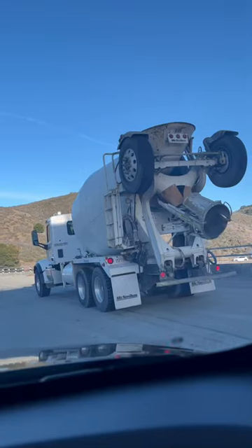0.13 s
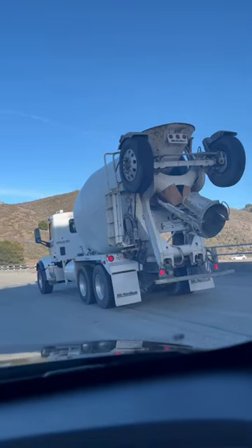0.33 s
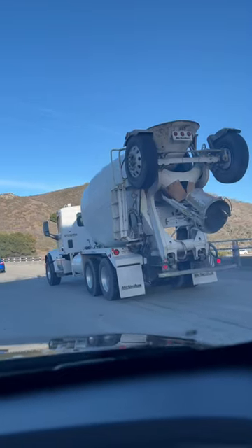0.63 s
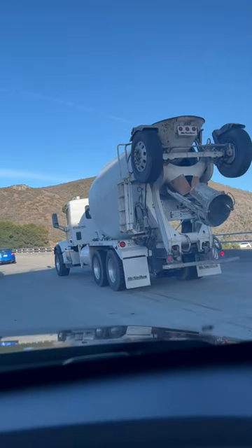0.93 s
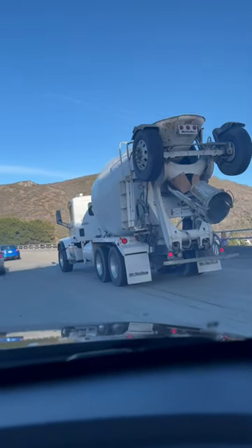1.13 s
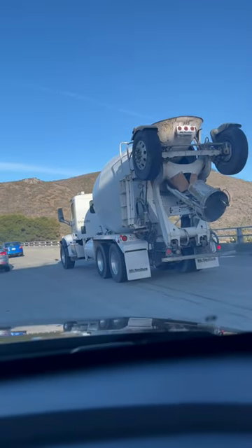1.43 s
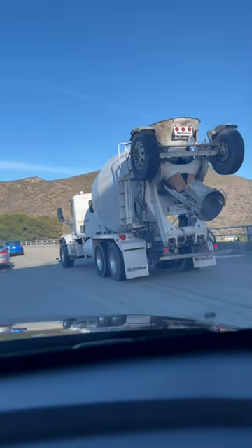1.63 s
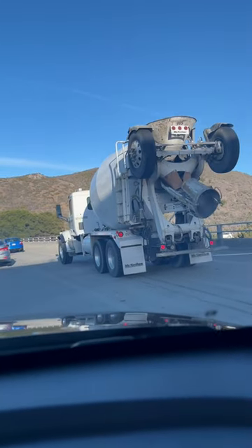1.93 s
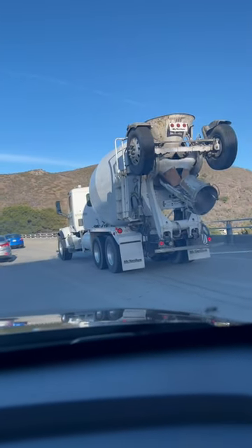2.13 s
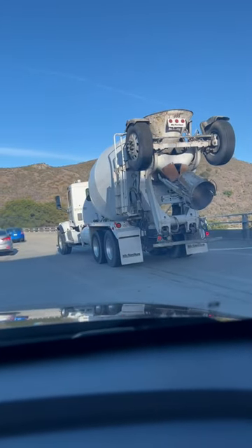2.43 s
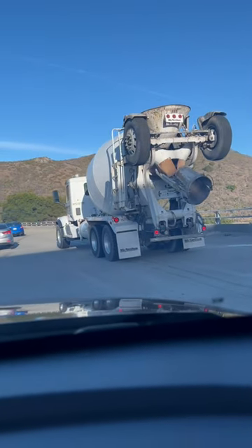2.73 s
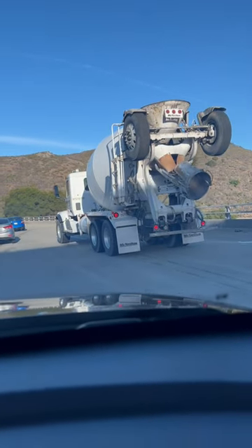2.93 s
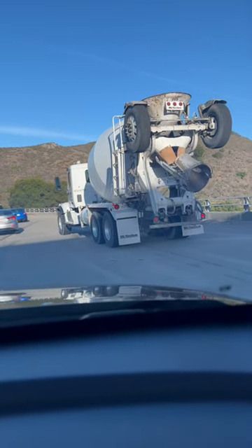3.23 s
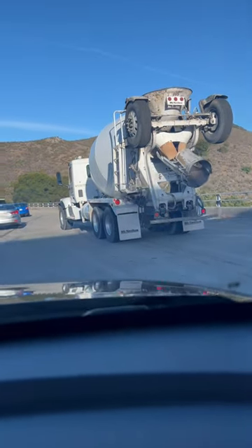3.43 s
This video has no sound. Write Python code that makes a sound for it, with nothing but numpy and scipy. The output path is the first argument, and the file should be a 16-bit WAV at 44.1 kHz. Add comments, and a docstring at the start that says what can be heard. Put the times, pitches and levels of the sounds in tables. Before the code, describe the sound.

Deep car-cabin rumble with diesel drone, a few finger taps, trim ticks and faint fabric rustles

```python
"""Inside a slowly moving car, as heard at a hand-held phone near the windscreen.
After a short silence a steady bed sets in: band-shaped noise for road rumble, boom, drone, tyre roar and
air hiss; sine lines on multiples of a diesel's cycle; a faint whine. Chirped finger taps begin at 0.35 s and
decaying noise ticks of trim at 0.56 s. A soft thump falls at 0.74 s and gliding squeaks come near 1 s;
from 1.4 s fabric rustles in swells of noise grains, and ticks are most frequent from 2.4 s on."""
import sys
import numpy as np
from scipy import signal
from scipy.fft import rfft, irfft
from scipy.io import wavfile
from scipy.ndimage import uniform_filter1d

SR = 44100
rng = np.random.default_rng(int(sys.argv[2]) if len(sys.argv) > 2 else 0)


def inscribe(sig):
    """Save sig as 16-bit PCM at rate SR to the path in sys.argv[1].

    A 1-D sig is mono; a 2-D sig holds one channel per row.
    Samples are clipped to [-1, 1] before scaling.
    """
    pcm = np.round(np.clip(np.atleast_2d(sig).T, -1, 1) * 32767)
    wavfile.write(sys.argv[1], SR, pcm.astype(np.int16))


N = 158319
TIME_S = np.arange(N) / SR
TOP_HZ = 15800  # upper band limit


def undb(db):
    """Level law: amplitude gain is 10 to the power dB / 20."""
    return 10 ** (np.asarray(db) / 20)


def col(table, k):
    """Linear interpolation: column k of a time table, at every sample."""
    points = np.array(table, float)
    return np.interp(TIME_S, points[:, 0], points[:, k])


def noise():
    """White noise: independent Gaussian samples."""
    return rng.standard_normal(N)


def colour(x, shape, lo_hz=0, hi_hz=1e9):
    """Spectral shaping by (f/Hz, level/dB) points, scaled to rms 1 within lo-hi by Parseval's theorem."""
    points = np.array(shape, float)
    f = np.arange(N // 2 + 1) * SR / N + 1e-3  # the offset keeps the logarithm finite
    gain_db = np.interp(np.log(f), np.log(points[:, 0]), points[:, 1], left=-200, right=-200)
    spectrum = rfft(x) * undb(gain_db)
    in_band = spectrum[(f > lo_hz) & (f < hi_hz)]
    return irfft(spectrum, N) * N / np.sqrt(2 * np.sum(np.abs(in_band) ** 2))


def walk(rate):
    """Low-pass random fluctuation: values drawn at the rate (Hz), smoothed twice; spread near 1."""
    k = int(SR / rate)
    held = np.repeat(rng.standard_normal(N // k + 1), k)[:N]
    return 1.3 * uniform_filter1d(uniform_filter1d(held, k), k)


def fade(t, t60):
    """Exponential decay from t = 0, falling 60 dB in t60 seconds."""
    return (t >= 0) * np.exp(-np.log(1000) * np.abs(t) / t60)


# Air hiss spectra, common and left-right difference: f/Hz, level/dB per Hz
HISS_SPECTRUM = [(3000, -11.5), (4000, 1.5), (4700, 3.5), (6000, 1), (8000, -2), (9600, -4), (11300, -5),
                 (12300, -26.5)]
HISS_SIDE_SPECTRUM = [(3000, -9.5), (4000, 1), (5300, -0.5), (6500, -11.5), (8500, -10.5), (10500, -7.5),
                      (14500, -0.5), (16000, -6.5)]
# Air hiss course: t/s, common level/dB, difference level/dB
HISS_LEVELS = [(0.05, -83.5, -87), (2.36, -88, -87.5), (2.63, -84, -84), (2.98, -86.5, -85),
               (3.3, -83, -82), (3.4, -77, -81.5), (3.56, -81, -78)]


def air():
    """Broadband flow noise, slightly uneven; returns mid and side."""
    lump = undb(1.0 * walk(13))
    mid = lump * undb(col(HISS_LEVELS, 1)) * colour(noise(), HISS_SPECTRUM)
    side = lump * undb(col(HISS_LEVELS, 2)) * colour(noise(), HISS_SIDE_SPECTRUM)
    return np.array([mid, side])


# Faint high whine: f/Hz, level/dB (peak amplitude, before fluctuation)
WHINE_LINES = [(9390, -104), (9508, -96), (9691, -99)]
# Squeaks: start t/s, length t/s, from f/Hz, to f/Hz, level/dB (peak amplitude, before roughness)
SQUEAK_GLIDES = [(0.964, 0.05, 2520, 2570, -65), (1.017, 0.028, 2400, 2530, -62),
                 (1.042, .026, 2450, 2200, -68), (1.068, .024, 2150, 2250, -74)]


def thin_tones():
    """Amplitude modulation: gliding squeaks made rough at a fast rate, over wavering whine lines."""
    squeaks = 0
    for start, length, from_hz, to_hz, db in SQUEAK_GLIDES:
        u = np.clip((TIME_S - start) / length, 0, 1)
        cycles = length * (from_hz * u + (to_hz - from_hz) * u ** 2 / 2)
        squeaks = squeaks + undb(db) * np.sin(np.pi * u) * np.sin(2 * np.pi * cycles)
    rough = undb(2.0 * walk(300))
    whine = sum(undb(db + 3.6 * walk(46)) * np.sin(2 * np.pi * hz * TIME_S) for hz, db in WHINE_LINES)
    return squeaks * rough + whine


# Fabric spectrum: f/Hz, level/dB per Hz
FABRIC_SPECTRUM = [(2500, -12), (4000, 8.5), (6500, 9), (9000, 5.5), (11500, 0.5), (13000, -38.5)]
# Rustle swells: start t/s, length t/s, level/dB at the crest
RUSTLE_SWELLS = [(1.4, 0.23, -80.5), (2.36, 0.14, -82.5), (2.769, 0.064, -71.5), (2.82, 0.057, -75.5),
                 (2.866, 0.054, -77.5), (3.03, 0.13, -89), (3.193, .04, -76), (3.321, .06, -81.5),
                 (3.383, 0.067, -73.5), (3.435, 0.15, -83)]
RUSTLE_PER_S, RUSTLE_SCATTER_DB, RUSTLE_SIDE_DB = 2500, 2, -4


def rustle():
    """Shot noise: dense random grains of fabric, heard in short swells; mid and side."""
    swell = 0
    for start, length, db in RUSTLE_SWELLS:
        u = np.clip((TIME_S - start) / length, 0, 1)
        swell = swell + undb(db) * np.sqrt(np.clip(np.sin(np.pi * u), 0, 1))
    struck = rng.random(N) < RUSTLE_PER_S / SR
    grains = struck * undb(RUSTLE_SCATTER_DB * rng.exponential(size=N))
    smear = signal.lfilter([1], [1, -.985], grains)  # each grain decays with a 1.5 ms time constant
    return swell * np.array([undb(db) * colour(smear * noise(), FABRIC_SPECTRUM)
                             for db in (0, RUSTLE_SIDE_DB)])


# Low modes of the trim, before scatter: f/Hz, level/dB, decay time t60/s
TRIM_MODES = [(1490, -6, .012), (2060, 0, .026), (2600, -10, .01), (3110, -4, 0.016), (3900, -9.5, .01),
              (4700, -9, .01)]
# Trim ticks: t/s, crack level/dB, crack centre f/Hz, low-mode level/dB
TRIM_TICKS = [(0.5627, -76, 6700, -62), (.579, -81, 7000, -79), (.9, -68, 10000, -71),
              (1.437, -81, 4000, -65), (1.484, -62.5, 8200, -45.5), (1.527, -78, 8000, -60.5),
              (1.955, -79.5, 9400, -75), (2.4315, -69.5, 6450, -73.5), (2.434, -73.5, 6480, -80),
              (2.501, -77, 8470, -81), (2.7314, -73, 4500, -65.5), (2.7845, -64, 6000, -59),
              (2.7975, -65, 6500, -66), (2.8285, -59.5, 7000, -60), (2.834, -64, 5000, -67),
              (2.843, -70, 5000, -63), (3.2027, -68.5, 5960, -57.5), (3.208, -72, 4500, -64),
              (3.378, -80, 3000, -60), (3.4345, -72, 3500, -53), (3.44, -68, 4800, -53),
              (3.458, -73, 7200, -78), (3.484, -70, 7900, -74)]
CLICK_T60_S, TAIL_T60_S, TAIL_DB = .025, 0.1, -11.5  # crack, then its cabin tail
CLICK_OCTAVES, SKIRT_DB = .7, -11.5  # the band falls by the skirt at this distance from its centre
CLICK_SIDE_DB = -5
CLICK_TOP_HZ, CLICK_SIDE_RAISE = 12000, 1.4  # the side part is centred higher


def crack_band(f, top):
    """Band-pass principle: a spectral peak at f with sloping skirts, cut steeply above top."""
    return [(f / 4, 3 * SKIRT_DB),
            (f * 2 ** -CLICK_OCTAVES, SKIRT_DB),
            (f, 0),
            (top, SKIRT_DB * np.log2(top / f) / CLICK_OCTAVES),
            (top + 700, -50)]


def trim_modes(t):
    """Modal superposition: damped sines, scattered anew in level and frequency."""
    low = 0
    for (hz, db, t60), (a, b) in zip(TRIM_MODES, rng.standard_normal((len(TRIM_MODES), 2))):
        tone = np.sin(2 * np.pi * hz * (1 + .015 * b) * t)
        low = low + undb(db + 2 * a) * (1 - np.exp(-t / .0003)) * tone * fade(t, t60)
    return low


def clicks():
    """Impulsive excitation of trim: a noisy crack with a cabin tail and low modes; mid and side."""
    length = 4000
    out, t = np.zeros((2, N + length)), np.arange(length) / SR
    envelope = fade(t, CLICK_T60_S) + undb(TAIL_DB) * fade(t, TAIL_T60_S)
    envelope = (1 - np.exp(-t / 0.00035)) * envelope
    for start, db, hz, low_db in TRIM_TICKS:
        low = trim_modes(t)
        bands = crack_band(hz, CLICK_TOP_HZ), crack_band(hz * CLICK_SIDE_RAISE, TOP_HZ)
        crack = np.array([colour(noise(), band)[:length] for band in bands])
        tick = undb(db) * crack * envelope + undb(low_db) * low
        i = int(start * SR)
        out[:, i:i + length] += tick * undb([[0], [CLICK_SIDE_DB]])
    return out[:, :N]


# Soft thump: t/s, level/dB (initial amplitude)
THUMPS = [(.738, -37)]
THUMP_HZ, THUMP_T60_S, THUMP_DROP_HZ_PER_S = 590, .045, 14000


def thump():
    """Damped oscillation of the body, with a pitch that falls at first."""
    out = 0
    for start, db in THUMPS:
        u = TIME_S - start
        mean_hz = THUMP_HZ - THUMP_DROP_HZ_PER_S * np.clip(u, 0, .02) / 2  # steady after 20 ms
        out = out + undb(db) * np.sin(2 * np.pi * mean_hz * u) * fade(u, THUMP_T60_S)
    return out


# Finger taps: t/s, level/dB (initial amplitude)
FINGER_TAPS = [(.346, -47.5), (0.5663, -36), (0.901, -43), (1.4375, -35), (1.482, -28), (3.477, -43)]
TAP_FROM_HZ, TAP_TO_HZ, TAP_GLIDE_S, TAP_T60_S = 1100, 280, 0.0025, .035


def taps():
    """Damped flexure: each finger tap bends the phone in an exponentially falling chirp."""
    out = 0
    for start, db in FINGER_TAPS:
        u = TIME_S - start
        glide = TAP_GLIDE_S * (1 - np.exp(-np.abs(u) / TAP_GLIDE_S))
        cycles = TAP_TO_HZ * u + (TAP_FROM_HZ - TAP_TO_HZ) * glide
        out = out + undb(db) * np.sin(2 * np.pi * cycles) * fade(u, TAP_T60_S)
    return out


# Tyre roar spectra, common and left-right difference: f/Hz, level/dB per Hz
ROAR_SPECTRUM = [(240, -24), (400, -6), (481, -6.5), (642, -11.5), (813, -9.5), (919, -8.5), (1130, -19),
                 (1390, -21), (1610, -26.5), (1820, -25.5), (2320, -30.5), (3240, -36.5), (4210, -44),
                 (7130, -120)]
ROAR_SIDE_SPECTRUM = [(35, -35.5), (60, -7.5), (91, -13), (153, -14), (313, -6), (358, -3.5), (460, 2),
                      (721, -2.5), (896, -2), (1750, -21.5), (2560, -11), (3240, -18.5), (4210, -48),
                      (7130, -120)]
# Tyre roar course: t/s, common level/dB, difference level/dB
ROAR_LEVELS = [(0.05, -54, -62), (0.28, -52.5, -61.5), (0.48, -55, -63.5), (1.23, -52, -60.5),
               (1.96, -52.5, -61.5), (2.44, -54.5, -62.5), (3.19, -52, -59), (3.56, -54.5, -59.5)]
# Band of the roar that leans to the right: f/Hz, level/dB
LEAN_SPECTRUM = [(700, -39), (1000, 2.5), (1600, -0.5), (2200, -42.5)]
LEAN_DB = -79


def tyres():
    """Random rolling and flow excitation: tyre and air roar, slightly uneven; mid and side."""
    lump = undb(1.7 * walk(9))
    mid = lump * undb(col(ROAR_LEVELS, 1)) * colour(noise(), ROAR_SPECTRUM, 450, 4000)
    side = lump * undb(col(ROAR_LEVELS, 2)) * colour(noise(), ROAR_SIDE_SPECTRUM)
    lean = undb(LEAN_DB) * colour(mid, LEAN_SPECTRUM)
    return np.array([mid, side - lean])


# Engine cycle before wobble: t/s, f/Hz
ENGINE_CYCLE = [(0, 23.45), (2, 23.35), (2.8, 23.1), (3.6, 22.9)]
# Engine orders: multiple of the cycle, then rms level/dB (before waver) at 13 even steps from start to end
ENGINE_ORDERS = [(4, -47.5, -42.5, -39, -48.5, -36.5, -41.5, -43, -37.5, -39.5, -37, -43, -35, -30.5),
                 (9, -37.5, -46.5, -39, -37.5, -41, -41.5, -42, -44, -54, -53, -55.5, -45, -50.5),
                 (10, -56, -50, -51, -52.5, -44.5, -50, -45.5, -45, -47, -46.5, -49.5, -53.5, -49),
                 (11, -41.5, -49.5, -57, -48, -50, -58, -44.5, -48, -48, -50, -47, -46.5, -51),
                 (13, -46, -47.5, -50.5, -51, -49, -59, -60, -57, -60, -58, -58, -63, -53.5),
                 (14, -68, -51.5, -53, -57.5, -54, -52, -58.5, -63.5, -68, -64, -62.5, -67, -53),
                 (16, -53.5, -57.5, -59, -56.5, -54, -50.5, -59, -59, -58, -57.5, -57, -57, -57)]
WAVER_DB, WAVER_RATE_HZ, WOBBLE = 2.2, 8, .0018  # level spread, its rate, relative speed spread


def engine():
    """Fourier series of a periodic source: wavering lines on multiples of the diesel's cycle."""
    turn = 2 * np.pi * np.cumsum(col(ENGINE_CYCLE, 1) * (1 + WOBBLE * walk(3.016))) / SR
    steps_s = np.linspace(0, N / SR, 13)
    lines = 0
    for order, *levels in ENGINE_ORDERS:
        db = np.interp(TIME_S, steps_s, levels) + WAVER_DB * walk(WAVER_RATE_HZ)
        phase = round(order) * turn + 2 * np.pi * rng.random()
        lines = lines + np.sqrt(2) * undb(db) * np.sin(phase)
    return lines


EVEN_S, EVEN_SHARE = .07, .55  # averaging time, share of the envelope divided out


def even(x):
    """Dynamic compression: partly divides out the noise's slow envelope, for a steadier shake; rms 1."""
    k = int(EVEN_S * SR)
    power = uniform_filter1d(uniform_filter1d(x ** 2, k), k // 2)
    x = x / power ** (EVEN_SHARE / 2)
    return x / np.std(x)


# Road rumble course: t/s, deep rumble level/dB, cabin boom level/dB
ROAD_LEVELS = [(0.05, -39, -38.5), (0.11, -31, -28), (0.25, -34.5, -34.5), (0.67, -31, -31),
               (1.11, -29, -38.5), (1.15, -26.5, -43.5), (1.22, -39.5, -28), (1.29, -27.5, -30.5),
               (1.45, -28, -28), (1.51, -36, -37.5), (1.54, -23, -32.5), (1.58, -27, -36),
               (1.75, -26.5, -26.5), (1.89, -26, -37), (2.02, -31, -33), (2.56, -28.5, -26.5),
               (2.59, -18, -26.5), (2.66, -28.5, -27), (3.17, -29, -28), (3.2, -40, -28), (3.27, -31, -19),
               (3.36, -30.5, -36), (3.41, -29, -22), (3.49, -23, -32.5), (3.52, -33.5, -20),
               (3.55, -25, -29)]
# Body drone course: t/s, level/dB
DRONE_LEVELS = [(0.05, -41.5), (0.68, -40), (0.8, -48), (0.91, -36), (1.12, -40.5), (2.55, -36.5),
                (3.55, -39.5)]
# Spectra of rumble, boom and drone: f/Hz, level/dB per Hz
RUMBLE_SPECTRUM = [(18, -28.5), (28, 3), (38, -1), (52, 6.5), (66, -1.5), (80, -13.5), (110, -38.5)]
BOOM_SPECTRUM = [(55, -31), (72, -3.5), (82, -0.5), (92, -1.5), (104, -4), (120, -11), (150, -28)]
DRONE_SPECTRUM = [(95, -22), (120, -6.5), (132, -0.5), (148, -0.5), (170, -2), (200, -9), (300, -13.5),
                  (400, -20), (520, -42.5)]


def road():
    """Forced random vibration: road texture shakes the body into rumble, boom and drone."""
    rumble = undb(col(ROAD_LEVELS, 1)) * even(colour(noise(), RUMBLE_SPECTRUM))
    boom = undb(col(ROAD_LEVELS, 2)) * even(colour(noise(), BOOM_SPECTRUM))
    drone = undb(col(DRONE_LEVELS, 1)) * even(colour(noise(), DRONE_SPECTRUM))
    return rumble + boom + drone


def scene():
    """Superposition in mid and side: side sounds, among them the taps, are opposite in the two ears."""
    mid, side = tyres() + air() + clicks() + rustle()
    mid = mid + thump() + road() + engine() + thin_tones()
    side = side + taps()
    return np.array([mid + side, mid - side])


START_S = .0354  # sound begins here


def record(dry):
    """Band limitation: a steep low-pass cuts the top, after a short silence and a 2 ms onset."""
    onset = np.clip((TIME_S - START_S) / 0.002, 0, 1)
    low_pass = signal.ellip(8, .2, 70, TOP_HZ, fs=SR, output="sos")
    return signal.sosfilt(low_pass, dry * onset)


dry = scene()
out = record(dry)
inscribe(out)
```